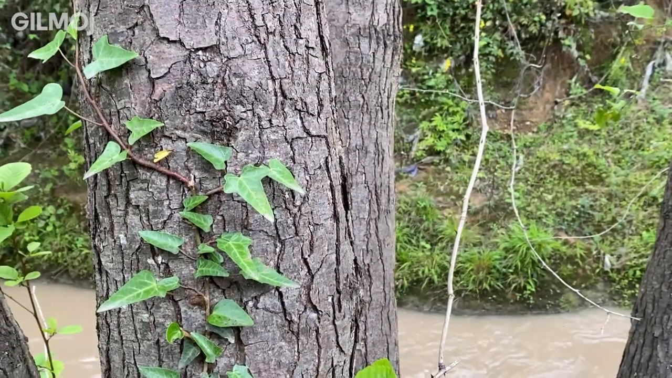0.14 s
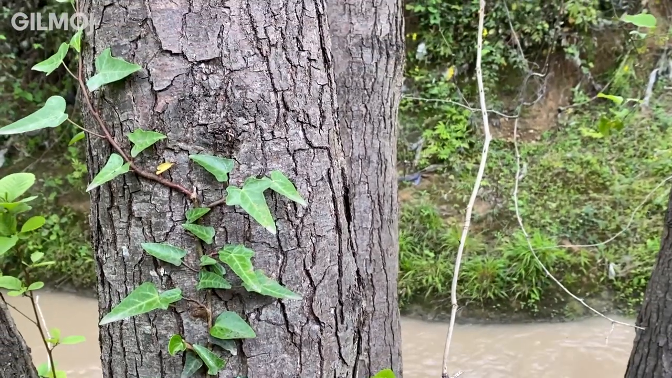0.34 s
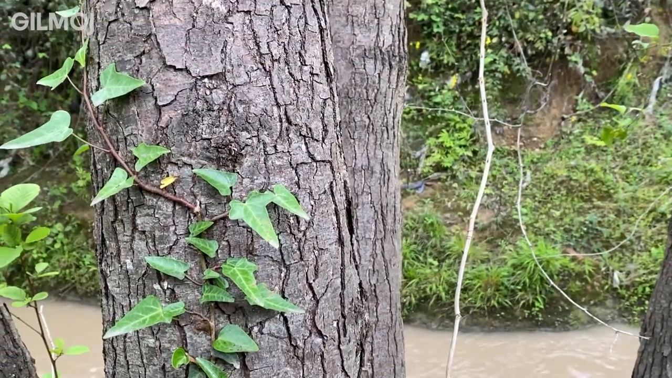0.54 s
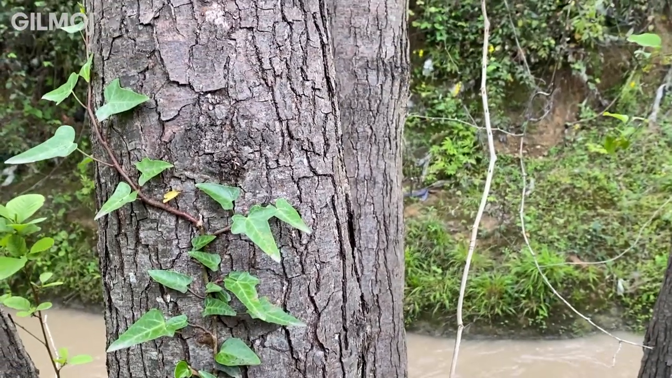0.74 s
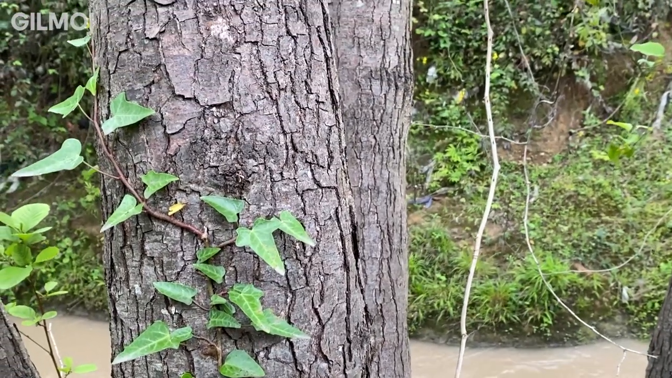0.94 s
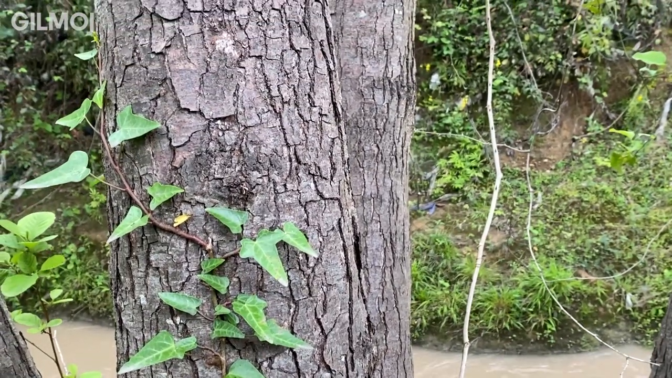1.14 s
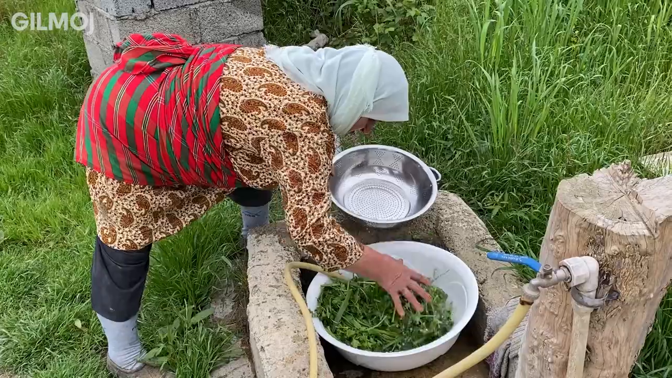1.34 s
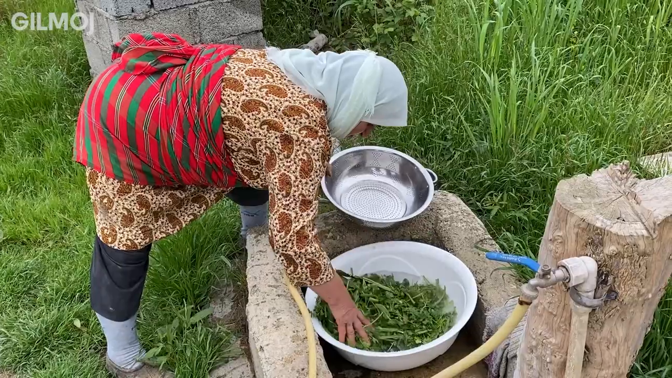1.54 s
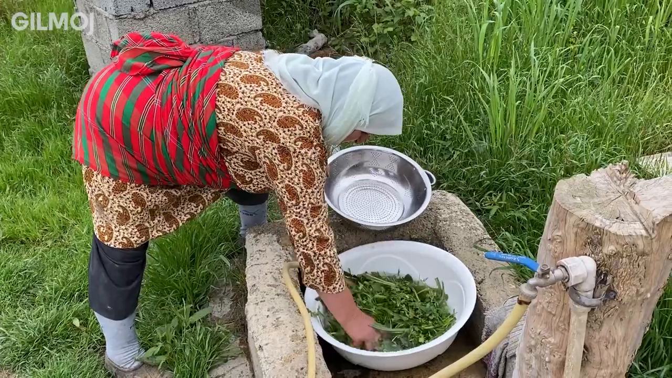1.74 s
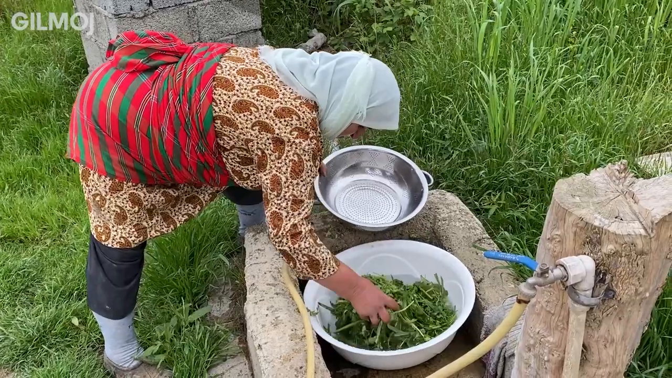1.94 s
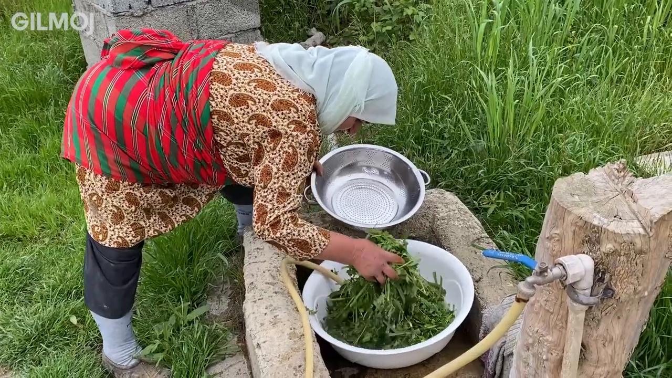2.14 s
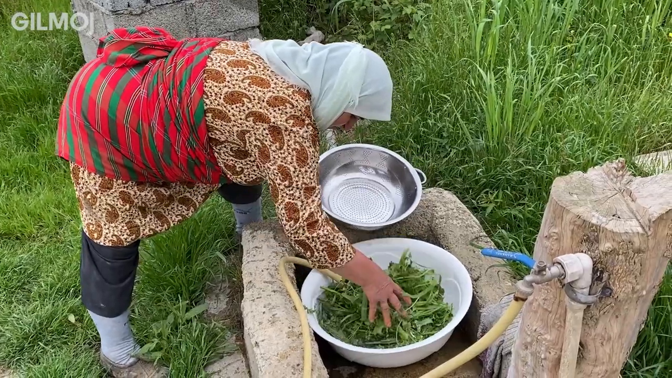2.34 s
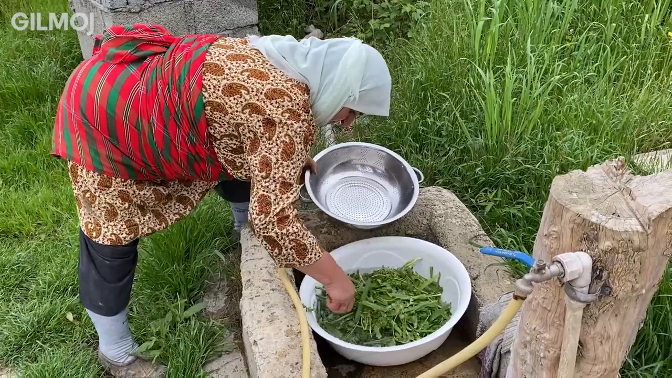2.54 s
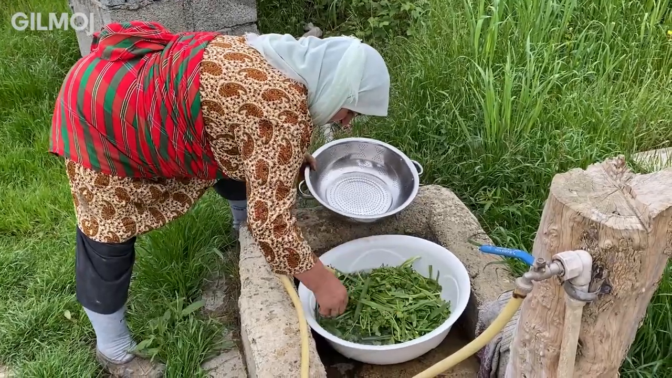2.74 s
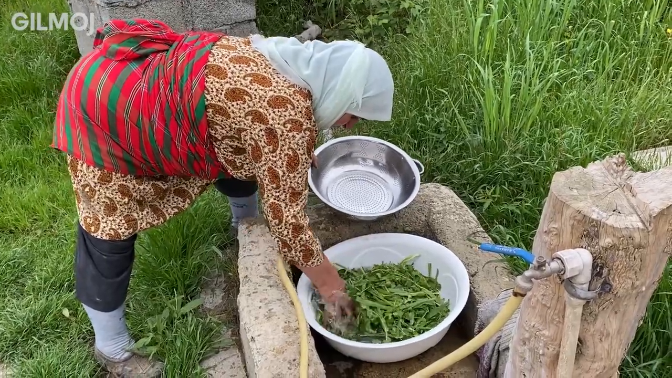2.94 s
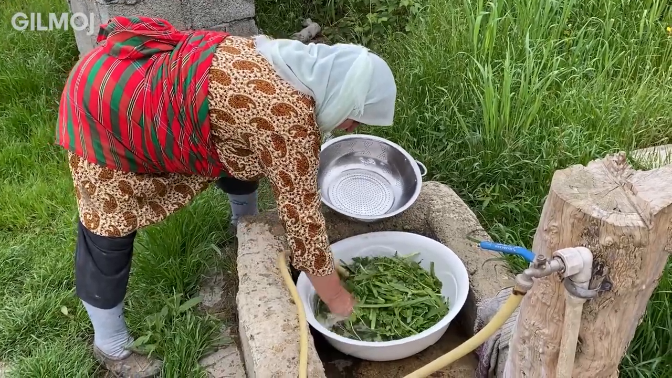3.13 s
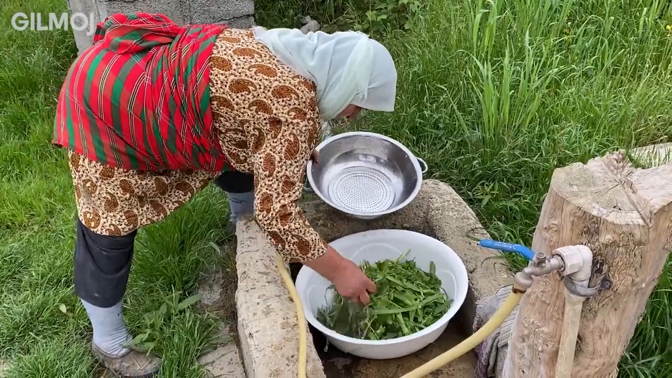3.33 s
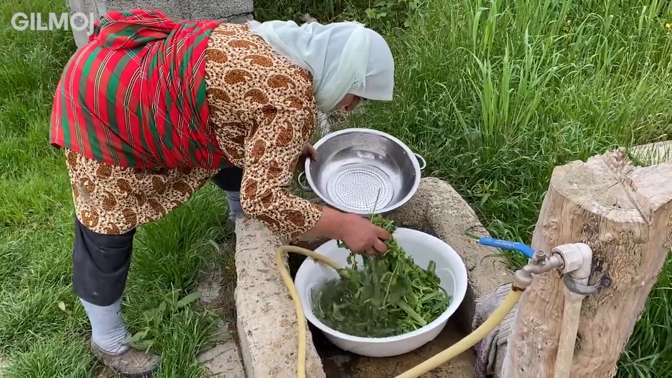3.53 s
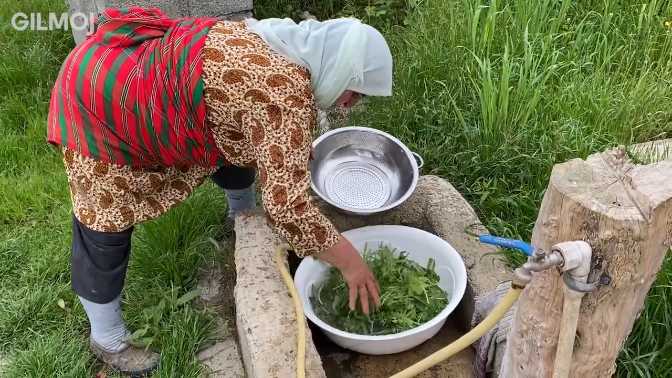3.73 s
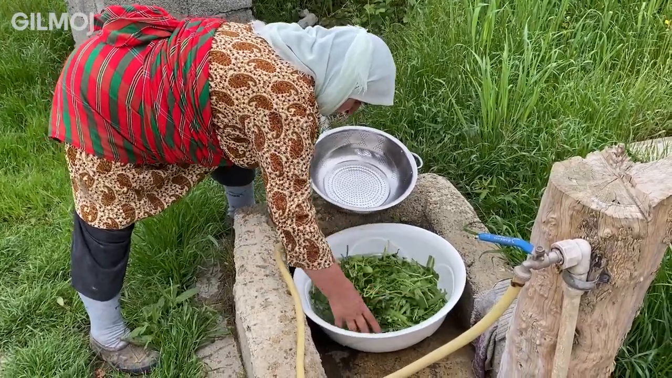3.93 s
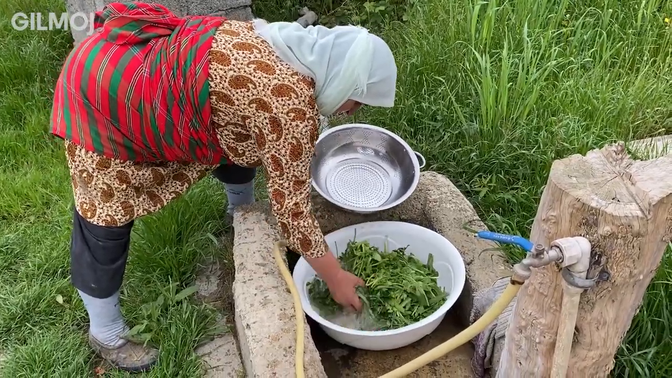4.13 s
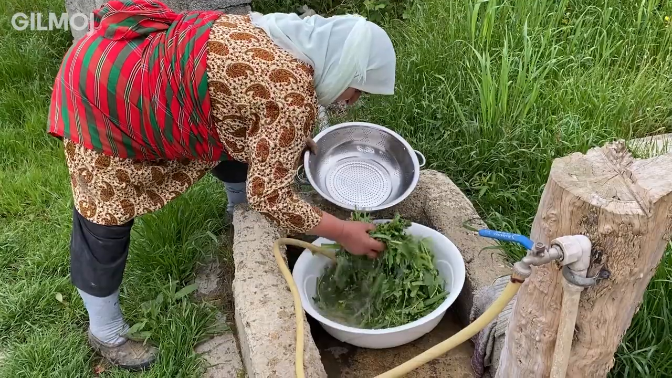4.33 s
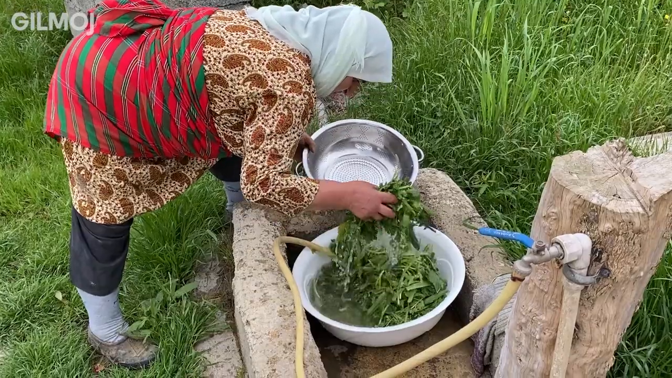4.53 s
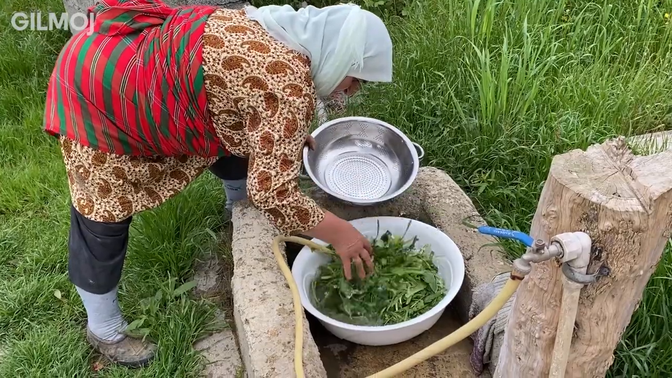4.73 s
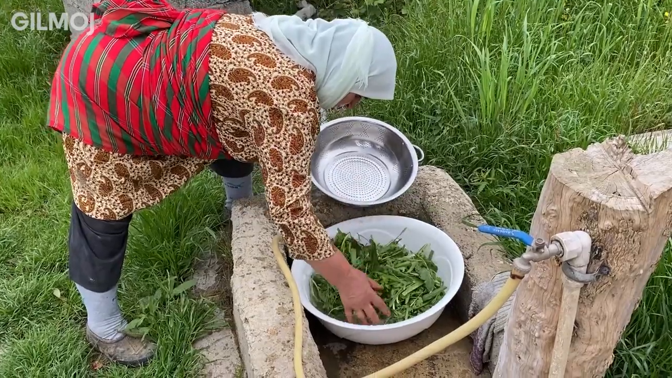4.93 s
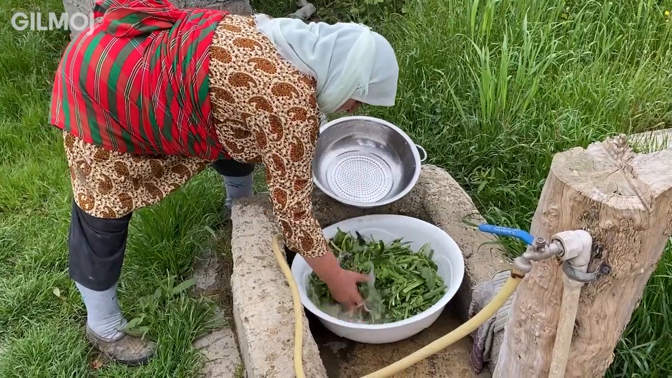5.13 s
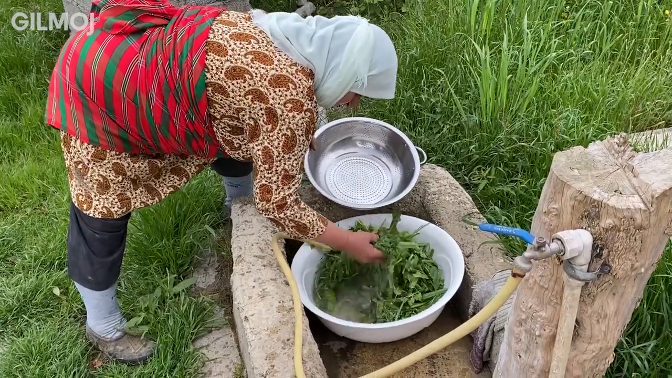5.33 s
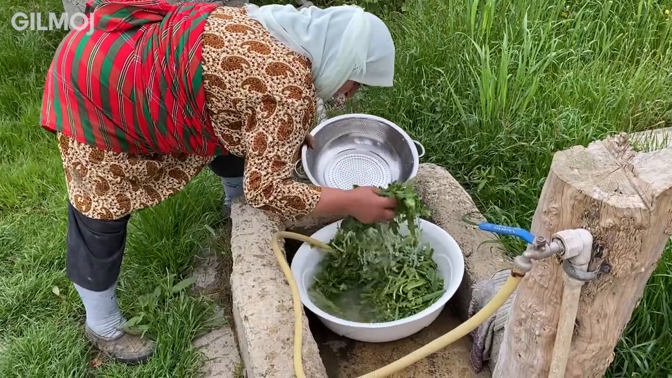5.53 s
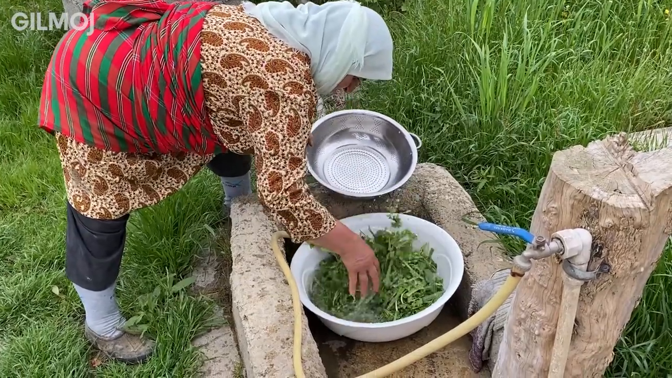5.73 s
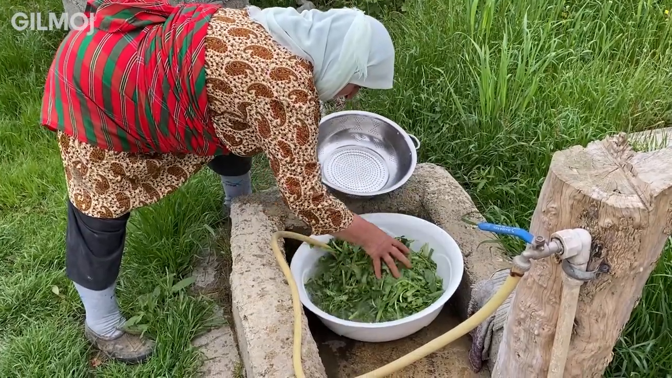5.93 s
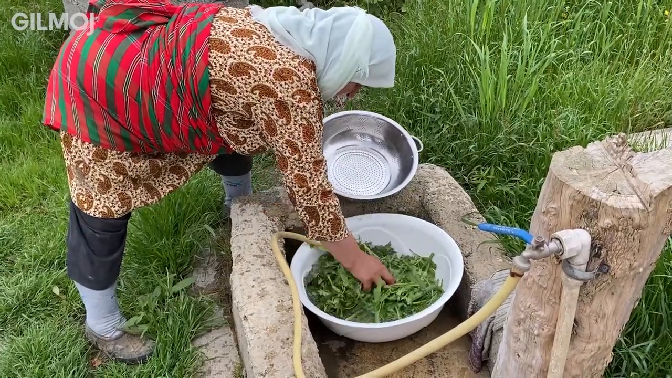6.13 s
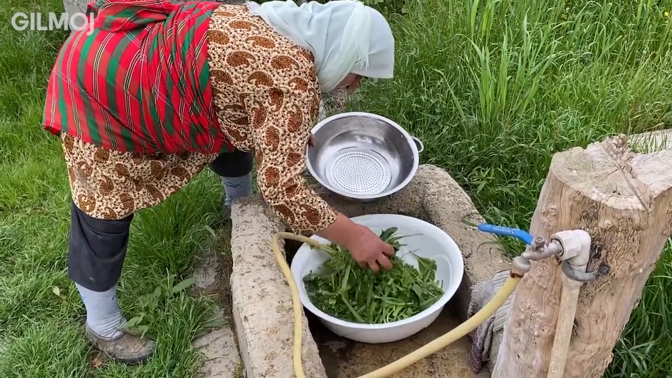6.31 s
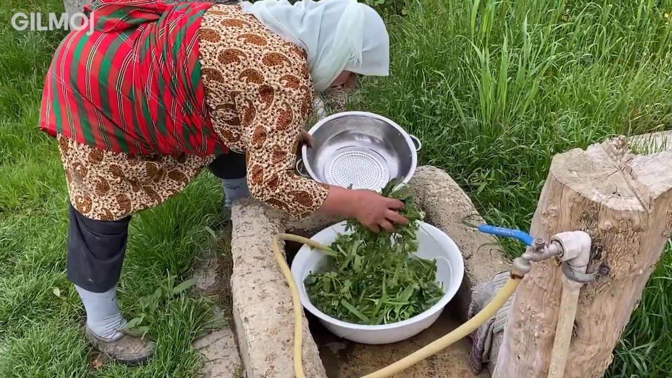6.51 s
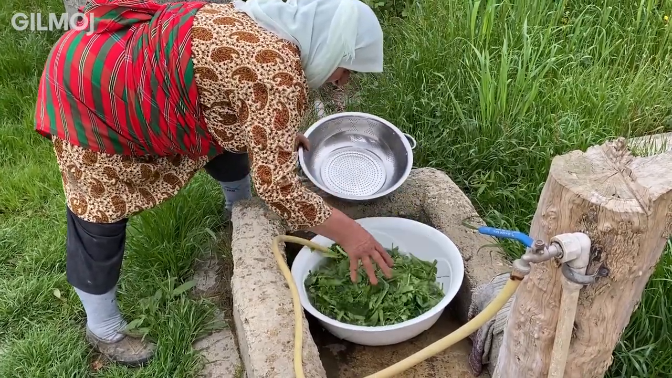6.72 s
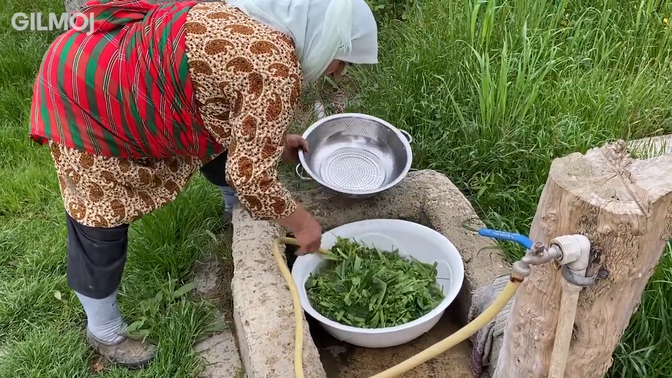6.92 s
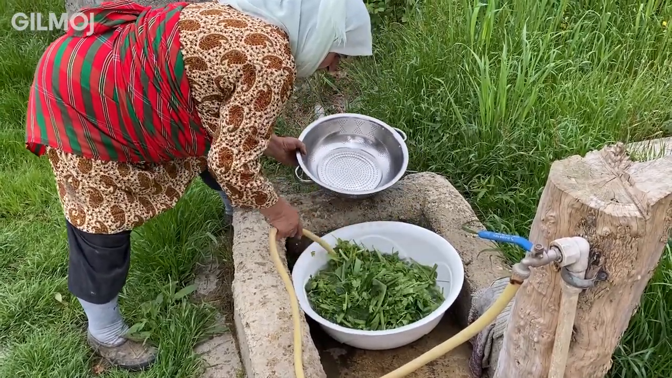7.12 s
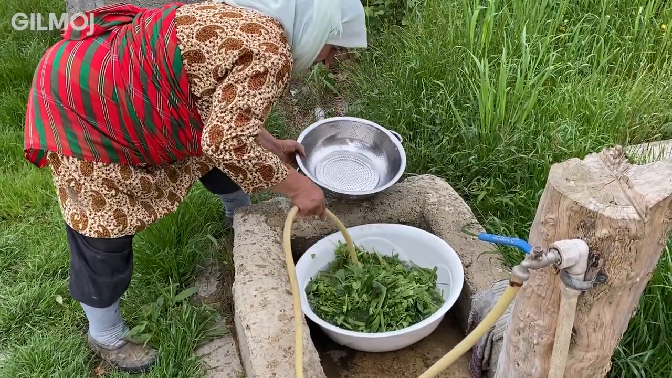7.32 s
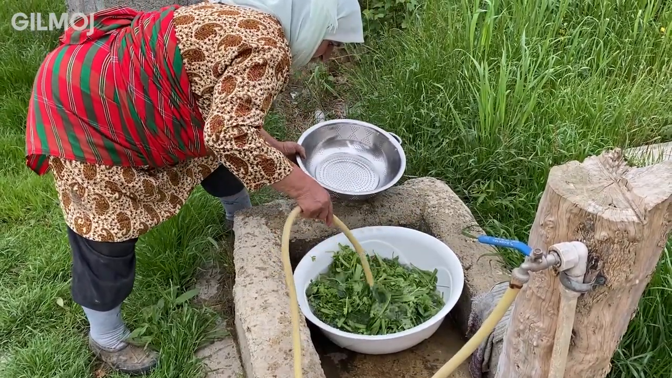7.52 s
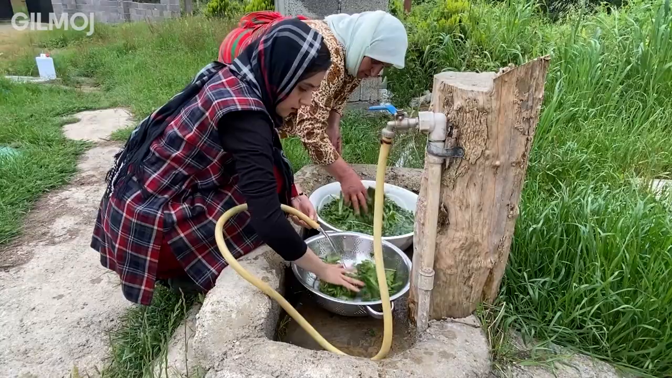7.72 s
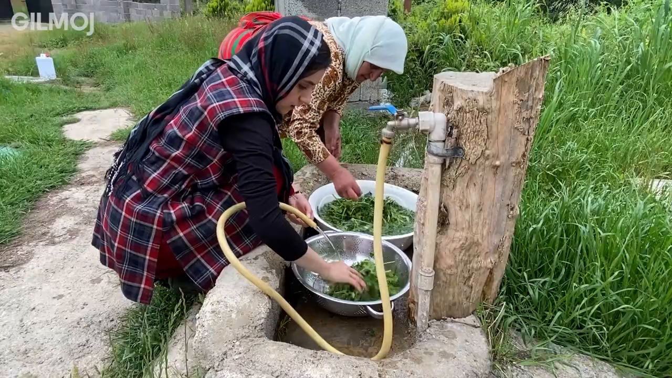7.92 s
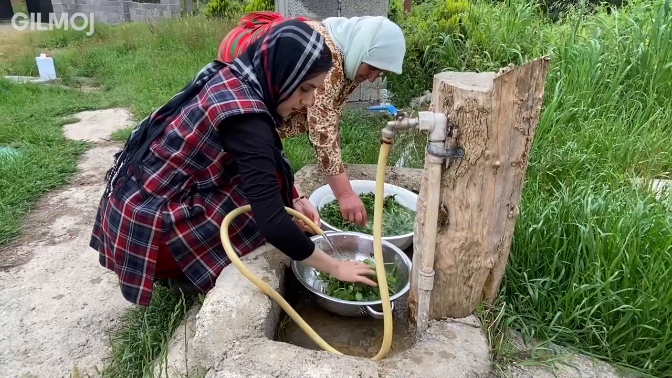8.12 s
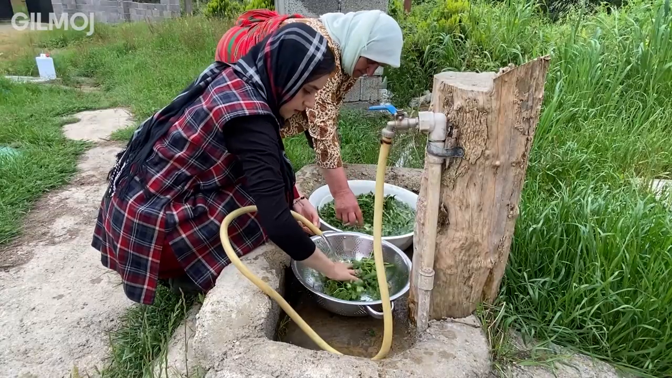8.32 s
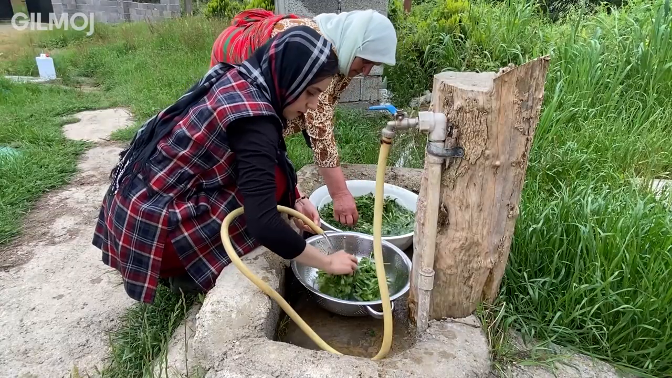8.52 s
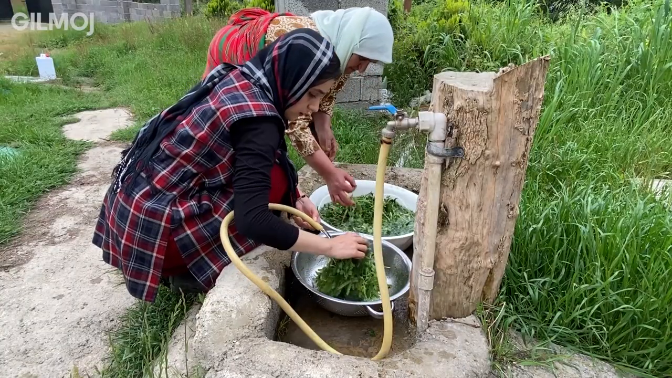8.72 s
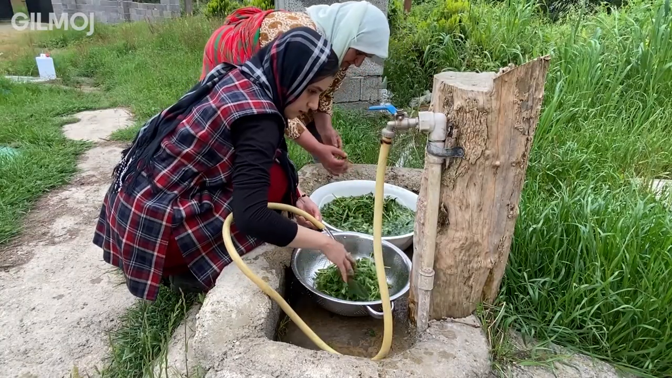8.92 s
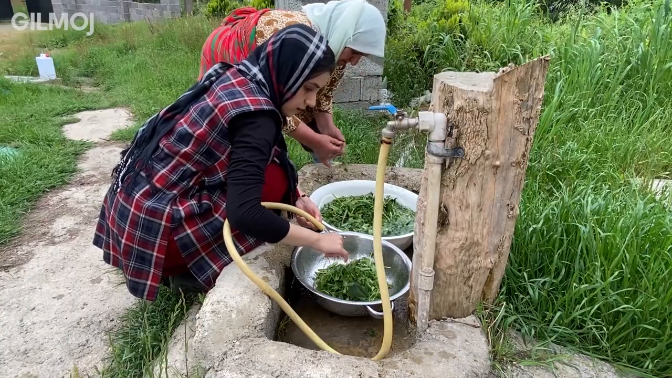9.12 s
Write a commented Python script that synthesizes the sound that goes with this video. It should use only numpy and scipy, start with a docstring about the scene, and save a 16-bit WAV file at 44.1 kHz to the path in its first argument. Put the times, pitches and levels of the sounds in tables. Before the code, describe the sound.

Close splashes, plops and drips of leaves being washed by hand outdoors, with distant birdsong, after a moment of running stream.

```python
"""Beside a murmuring stream, then at a garden tap where a hand stirs, lifts and drops wet greens in a bowl.
Close to the microphone the water sloshes and sprays, bubbles ring, leaves snap and the bowl is knocked.
Songbirds whistle, trill and buzz in trees some way off, blurred by echoes from trunks and leaves.
Under it all lies the low hum of the countryside, with one soft bump near the microphone."""
import sys
import numpy as np
from scipy import signal
from scipy.fft import rfft, irfft
from scipy.io import wavfile
from scipy.ndimage import uniform_filter1d

SR = 44100
rng = np.random.default_rng(int(sys.argv[2]) if len(sys.argv) > 2 else 0)


def put_to_file(sound):
    """Save the sound as 16-bit audio at rate SR, in the file named by the first command-line argument."""
    columns = np.atleast_2d(sound).T  # one column per channel
    safe = np.clip(columns, -1, 1)
    whole_steps = np.round(safe * 32767)
    wavfile.write(sys.argv[1], SR, whole_steps.astype(np.int16))


N = 403956


def washing():
    """Hand and greens in the water, close up: bubbly slosh, crisp slaps and crackling spray."""
    # hand sweeps: (start [s], peak [s], end [s], slosh [dB], spray [dB])
    stirs = [(1.567, 1.676, 1.925, -52.5, -59), (2.898, 3.09, 3.43, -44.5, -50),
             (3.437, 3.562, 3.87, -88, -62.5), (4.026, 4.097, 4.492, -44, -52),
             (4.415, 4.51, 4.97, -66, -56), (5.04, 5.145, 5.595, -47.5, -55.5),
             (7.302, 7.427, 7.95, -103, -58.5)]
    # greens hitting the water: (peak [s], rise [s], slap [dB], spray re slap [dB], slosh re slap [dB])
    splashes = [(1.419, 0.021, -36.5, 1.5, -1.5), (2.3, .064, -77.5, 17.5, -9),
                (2.404, 0.023, -42.5, -1.5, -5.5), (3.12, 0.018, -45.5, -1, -18),
                (3.238, 0.0021, -45, -2, -11), (3.792, 0.013, -42, 5.5, 5.5),
                (4.811, 0.039, -39, 1.5, -3.5), (5.269, 0.0073, -49, 4, -2), (5.783, .017, -35, 2.5, -5.5),
                (6.134, 0.042, -49, -10, -25), (6.722, 0.021, -47.5, 4, -7), (8.08, 0.094, -69, 10, -4),
                (8.491, 0.036, -59, -3, -20)]
    # the hand going under without spray: (time [s], level [dB])
    plunges = [(3.913, -44.5), (4.976, -44.5)]
    # spectra of churning water, slaps and spray: (frequency [Hz], relative level [dB])
    churn_spectrum = [(200, -9), (500, -3.5), (900, -5), (1700, 2), (3000, 0), (7000, -18), (10000, -70)]
    slap_spectrum = [(400, -30), (1000, -10.5), (1600, 1.5), (3000, 1.5), (5000, -8.5), (9000, -26)]
    spray_spectrum = [(2000, -8.5), (4000, 5), (10000, 3), (15500, -3.5)]
    t = np.arange(N) / SR
    slosh, spray, slap = np.zeros((3, N))
    lumps = flicker(450, 2.4)  # stirring comes in small surges
    for start, peak, end, slosh_db, spray_db in stirs:
        gate = np.clip(np.minimum((t - start) / .015, (end - t) / .09 + .5), 0, 1) * lumps
        from_peak = np.interp(t, [start, peak, end], [1, 0, 1])
        sweep_db = np.where(t < peak, -34.5, -24) * from_peak ** 1.66
        slosh += gate * amp(slosh_db + sweep_db)
        spray += gate * amp(spray_db + 0.22 * sweep_db)  # spray follows the sweep only in part
    for time, rise, db, spray_db, slosh_db in splashes:
        impact = surge(t - time, rise, t60=0.11 + 1.74 * rise)  # slower slaps die more slowly
        slap += amp(db) * impact
        slosh += amp(db + slosh_db) * impact
        spray += amp(db + spray_db) * impact
    for time, db in plunges:
        slosh += amp(db) * surge(t - time, rise=0.0029, t60=0.4)
    churn = colour(rng.standard_normal(N) * flicker(80, 0.57), churn_spectrum)
    froth = bubbles(per_s=420, low_hz=880, high_hz=3800, cycles=26, spread_db=3)
    crisp = colour(rng.standard_normal(N) * flicker(60, 2.9), slap_spectrum)
    crackle = colour(rng.standard_normal(N) * flicker(40, 4.2) * flicker(300, 2.5), spray_spectrum)
    return slosh * (.64 * churn + .75 * froth) + slap * (crisp + 0.24 * froth) + spray * crackle


def bubbles(per_s, low_hz, high_hz, cycles, spread_db):
    """Froth: many bubbles ring briefly, each at a random pitch and strength."""
    strength = amp(spread_db * np.minimum(rng.exponential(1, N), 4))
    births = strength * (rng.random(N) < per_s / SR)
    kind = rng.integers(0, 16, N)
    return evened(sum(signal.oaconvolve(births * (kind == k), ring(hz, cycles / hz, glide=0.072))[:N]
                      for k, hz in enumerate(np.geomspace(low_hz, high_hz, 16))))


def drops():
    """Single drops and bubbles plop with a rising tone, roughened by splatter."""
    # plops: (time [s], level [dB], pitch [Hz])
    plops = [(1.729, -36, 2300), (2.44, -43.5, 803), (3.057, -33, 1013), (3.25, -38.5, 1384),
             (3.313, -38, 1630), (3.969, -36, 620), (4.146, -38, 665), (4.189, -39, 678),
             (4.397, -34.5, 1027), (4.528, -40.5, 923), (4.685, -33.5, 2300), (4.732, -37.5, 777),
             (5.079, -34.5, 842), (5.127, -33.5, 1575), (5.195, -32.5, 1600), (5.226, -34, 1715),
             (5.397, -36, 3340), (6.964, -44.5, 2570), (8.678, -51.5, 1570), (8.809, -39, 2790)]
    out = np.zeros(N)
    for time, db, hz in plops:
        plop = ring(hz, t60=.045 + 20 / hz, glide=.04)
        splatter = .75 + .55 * flutter(len(plop), 40)
        swell = np.minimum(np.arange(len(plop)) / SR / .0025, 1)
        add(out, time, amp(db) * plop * swell * splatter)
    return out


def leaf_snaps():
    """Wet leaves snap: a bright crack with a short tail over a weaker midrange body."""
    # snaps: (time [s], level before filtering [dB])
    snaps = [(1.901, -35), (3.124, -27), (3.235, -22), (4.3222, -33), (4.789, -25.5), (5.3822, -37.5),
             (5.7504, -26), (5.7738, -19), (7.3104, -46), (7.3841, -49), (7.4255, -45), (7.599, -22),
             (7.6393, -40), (7.6908, -30.5), (7.7423, -36.5), (8.067, -42), (8.469, -27.5)]
    out, t = np.zeros(N), np.arange(1500) / SR
    for time, db in snaps:
        crack = rng.standard_normal(len(t)) * (amp(-60 * t / 0.0086) + 0.19 * amp(-60 * t / 0.059))
        for band_hz, band_db in ([6800, 12500], 0), ([2200, 6500], -6.5):
            band = signal.lfilter(*signal.butter(2, band_hz, "band", fs=SR), crack)
            add(out, time, amp(db + band_db) * band)
    return out


def squelches():
    """Squeezed leaves and hollow gulps of water: short, fading bands of noise."""
    # squeezes: (time [s], length [s], start [Hz], end [Hz], level [dB], stays in tune for [cycles])
    squeezes = [(1.445, 0.048, 804, 482, -30.5, 1.1), (3.019, 0.19, 747, 852, -48.5, 2),
                (3.908, 0.057, 2620, 2510, -40, 8.4), (3.91, 0.082, 190, 151, -42, 1.2),
                (4.967, 0.056, 2580, 2420, -39.5, 4.7), (5.031, 0.13, 336, 301, -44.5, 1.3),
                (5.162, 0.11, 216, 233, -47.5, 2.7), (5.266, 0.044, 3270, 3430, -37.5, 3.8),
                (5.268, 0.042, 810, 1224, -39, 4.5), (5.774, 0.031, 1290, 1170, -27, 1.7),
                (7.387, 0.088, 3300, 3810, -50.5, 1), (7.749, 0.098, 2520, 1957, -42.5, 1.27),
                (8.771, 0.034, 2330, 2160, -33, 4.3)]
    out = np.zeros(N)
    for time, length, start_hz, end_hz, db, cycles in squeezes:
        gulp = note(length, start_hz, end_hz, db, rough=0.77, hold=round(cycles * SR / start_hz))
        add(out, time, gulp * amp(np.linspace(4, -12, len(gulp))))
    return out


def bowl_knocks():
    """Each knock rings the bowl's modes, some dull and some bright."""
    # knocks: (time [s], strength [dB], tilt of the modes [dB/octave])
    knocks = [(1.451, -33.5, 3.5), (3.913, -27, -34), (3.991, -28.5, -24), (7.603, -39.5, 6),
              (7.692, -43, -1)]
    # bowl modes: (frequency [Hz], relative level [dB], t60 [s])
    modes = [(223, -23, 0.26), (320, 0, 0.2), (409, 8, 0.1), (610, -18, 0.29), (1372, -8.5, 0.06)]
    out = np.zeros(N)
    for time, db, tilt in knocks:
        for hz, mode_db, t60 in modes:
            add(out, time, amp(db - 11 + mode_db + tilt * np.log2(hz / 300)) * ring(hz, t60))
    return out


def stream(end_s=1.29):
    """On the bank: a dense fizz of running water that stops when the place changes."""
    # running water: (frequency [Hz], relative level [dB])
    spectrum = [(59, -32), (100, -32), (243, -9.5), (396, -4.5), (814, -3), (5480, -12.5), (8550, -18.5),
                (10300, -14), (15800, -29)]
    gate = np.clip((end_s - np.arange(N) / SR) / 0.0032, 0, 1)
    fizz = colour(rng.standard_normal(N) * flicker(60, 1.6), spectrum)
    return amp(-55.5) * gate * microphone(fizz, scatter=0.31, right_db=1.8)


def birds():
    """Songbirds at two distances: the deeper in the trees, the longer the blur."""
    # warbler songs: (time [s], level [dB])
    songs = [(.65, -54), (5.92, -52.5)]
    far = far_birds()
    near = near_whistles()
    song = sum(warbler(time, db) for time, db in songs)
    rattle = rattling_bird()
    near += amp(-5) * song + amp(-2) * rattle
    far += song + amp(1.5) * rattle
    return trees(near, t60=.35, blur_db=-1) + trees(far, t60=1.25, blur_db=4)


def warbler(start, db):
    """One song: three trills around a verse sung twice, then two buzzes, each closed by a downstroke."""
    # verse notes: (offset [s], length [s], start [Hz], end [Hz], relative level [dB])
    verse = [(-.09, 0.04, 4800, 3504, -3.5), (-.004, 0.0333, 5674, 4950, 4)]
    # trills: (offset [s], relative level [dB])
    trills = [(-.4, -3), (.112, 4), (.46, 5.5)]
    # notes in each trill: (count)
    trill_counts = [7, 5, 5]
    # song ending: (buzz offset [s], buzz length [s], downstroke offset [s])
    ending = [(0.626, 0.143, .79), (0.849, 0.1, 0.952)]
    song = np.zeros(N)
    for k in range(2):
        for offset, *shape in verse:
            add(song, start + offset + k * .372, note(*shape, rough=.4, hold=60))
    for (offset, trill_db), count in zip(trills, trill_counts):
        for k in range(count):
            length, end_hz, top_hz = rng.normal(1, .015, 3) * (.018, 4250, 5450)  # no two alike
            flick = arched_note(length, end_hz, top_hz, db=rng.normal(trill_db - 3, 1.5))
            add(song, start + offset + k * .0325, flick)
    for buzz_s, length, stroke_s in ending:
        add(song, start + buzz_s, note(length, 5760, 5720, db=0.79, rough=0.59, hold=55))
        add(song, start + stroke_s, note(0.0247, 5500, 4340, db=5.3, rough=0.22, hold=40))
    return amp(db) * song


def near_whistles(echo_s=.068, echo_db=-9):
    """Birds close by: three falling whistles and some thin high ones, with a single echo."""
    # thin whistles: (time [s], length [s], start [Hz], end [Hz], level [dB])
    whistles = [(3.519, 0.032, 6840, 6900, -48.5), (3.637, .022, 7200, 6900, -49),
                (3.906, .028, 7560, 7360, -49), (3.926, 0.029, 6750, 6920, -36),
                (4.04, 0.028, 7150, 7130, -44), (4.319, 0.036, 6860, 7220, -40)]
    out = np.zeros(N)
    for k, db in enumerate([-42, -36.5, -44.5]):
        add(out, 3.705 + k * .404, note(0.0618, 6320, 5880, db, rough=0.18, hold=60))
    for time, *shape in whistles:
        add(out, time, note(*shape, rough=0.22, hold=60))
    return out + amp(echo_db) * np.roll(out, round(echo_s * SR))


def rattling_bird(start_s=3.69, every_s=.0457, peak_s=4.21):
    """A run of fast downstrokes that swells and fades."""
    out = np.zeros(N)
    for time in start_s + every_s * np.arange(22):
        db = rng.normal(-40 - 10 * ((time - peak_s) / 0.48) ** 2, 1.3)
        add(out, time, note(.014, 6700, 4760, db, rough=0.55, hold=40))
    return out


def far_birds():
    """Deep in the trees: a repeated phrase, three climbing buzzes and stray calls."""
    # phrase notes: (offset [s], length [s], start [Hz], end [Hz], relative level [dB])
    phrase = [(0, 0.03, 3997, 4780, 4), (.075, .032, 6400, 3990, 3.5), (.122, .045, 5640, 3130, 1),
              (.165, 0.0298, 3250, 2895, -0.5)]
    # stray calls: (time [s], length [s], start [Hz], end [Hz], level [dB])
    calls = [(4.93, 0.043, 4590, 4580, -52), (4.996, 0.091, 5136, 5560, -49.5),
             (6.932, 0.032, 4400, 3070, -56), (6.983, 0.039, 3400, 4400, -56.5),
             (8.921, 0.035, 5200, 4630, -58.5)]
    out = np.zeros(N)
    for k in range(8):
        gain = amp(-52 - 2.5 * max(3 - k, 0))  # full voice from the fourth phrase on
        for offset, *shape in phrase:
            add(out, .47 + k * .297 + offset, gain * note(*shape, rough=0.55, hold=40))
    for k in range(3):  # each buzz trails into a faint, long falling whistle
        time, climb_hz = 2.95 + k * .232, k * 139
        add(out, time, note(0.16, 5299.5 + climb_hz, 5502 + climb_hz, db=-49, rough=0.73, hold=40))
        add(out, time + .155, note(0.43, 5096.5, 4418.5, db=-58, rough=0.45, hold=55))
    for time, *shape in calls:
        add(out, time, note(*shape, rough=.65, hold=60))
    return out


def bump(time=2.52, db=-38, hz=48, length=.05):
    """A short low push near the microphone, not quite in step on the two sides."""
    t = np.arange(N) / SR - time
    phase = np.array([[.4], [-.4]])
    return amp(db) * np.exp(-(2 * t / length) ** 2) * np.cos(2 * np.pi * hz * t + phase)


def country_air():
    """Distant hum and hiss of the countryside, with drifting louder and softer patches."""
    # open air: (frequency [Hz], relative level [dB])
    spectrum = [(25, -51), (59, 10), (91, 1), (235, -9), (461, -18), (710, -16.5), (1510, -25),
                (2970, -21.5), (3680, -27), (5520, -19), (7630, -30.5), (14600, -36), (15800, -37)]
    # bass of the hum: (time [s], gain [dB])
    bass = [(1.2, -15.5), (1.35, -2.5), (9.2, 0)]
    # likeness of left and right: (frequency [Hz], correlation [0-1])
    likeness = [(60, 0.92), (150, 0.71), (380, 0.24), (950, 0.011), (2380, 0.91), (5980, 1), (15000, 0.48)]
    frames, hz = N // 256 + 5, np.fft.rfftfreq(1024, 1 / SR)
    left_re, left_im, apart_re, apart_im, patches = rng.standard_normal((frames, 513, 5)).T
    patches = evened(uniform_filter1d(uniform_filter1d(patches, 10, 0), 20, 1))
    bass_db = np.interp(np.arange(frames) * 256 / SR, *np.transpose(bass))
    hum_db = bass_db / (1 + (hz[:, None] / 180) ** 2)
    shared = curve_at(likeness, hz)[:, None]
    left = left_re + 1j * left_im
    right = shared * left + np.sqrt(1 - shared ** 2) * (apart_re + 1j * apart_im)
    right *= amp(0.93 / (1 + (hz[:, None] / 1500) ** 2))  # the hum sits a little to the right
    gain = amp(curve_at(spectrum, hz)[:, None] + 2.57 * patches + hum_db)
    _, air = signal.istft(np.array([left, right]) * gain, nperseg=1024, noverlap=768)
    return amp(-56.5) * evened(air[:, :N])


def trees(sound, t60, blur_db):
    """Direct sound plus the diffuse blur of trunks and leaves."""
    t = np.arange(SR) / SR
    mid, side = rng.standard_normal((2, SR)) * amp(-60 * t / t60)
    tail = mid + 0.0073 * side * np.array([[1], [-1]])
    blur = signal.fftconvolve(sound[None], tail / np.linalg.norm(tail[0]), axes=1)[:, :N]
    return sound + amp(blur_db) * blur


def microphone(sound, scatter, right_db):
    """Two ports: scattered sound adds on one side and cancels on the other; treble reaches the left late."""
    hz = np.fft.rfftfreq(N, 1 / SR)
    late = np.exp(-2j * np.pi * np.maximum(hz - 6850, 0) * 13 / SR)  # 13 samples, above 6850 Hz
    tail = rng.standard_normal(3000) * amp(-60 * np.arange(3000) / SR / 0.072)
    side = scatter * signal.oaconvolve(sound, tail / np.linalg.norm(tail))[:N]
    lean = amp(right_db / (1 + (hz / 4000) ** 2))  # lows and mids lean to the right
    return np.array([irfft(rfft(sound + side) * late / lean, N), irfft(rfft(sound - side) * lean, N)])


def note(length, start_hz, end_hz, db, rough, hold):
    """A gliding sine that levels off; rough is the share of its amplitude that flutters."""
    progress = np.linspace(0, 1, round(length * SR))
    hz = end_hz + (start_hz - end_hz) * (1 - progress) ** (1 + 12.13 * min(length, .06))
    envelope = signal.windows.tukey(len(hz), .5) * (1 - rough + rough * flutter(len(hz), hold))
    return amp(db) * envelope * np.sin(2 * np.pi * np.cumsum(hz) / SR)


def arched_note(length, end_hz, top_hz, db):
    """A clean note that flicks up and down again."""
    hz = top_hz + (end_hz - top_hz) * abs(np.linspace(-1, 1, round(length * SR)))
    return amp(db) * signal.windows.tukey(len(hz), .3) * np.sin(2 * np.pi * np.cumsum(hz) / SR)


def ring(hz, t60, glide=0.):
    """A dying tone with a soft start; glide raises its pitch, as in a bubble."""
    t = np.arange(round(t60 * SR)) / SR
    envelope = np.minimum(t / 0.0014, 1) * amp(-60 * t / t60)
    return envelope * np.sin(2 * np.pi * hz * t * (1 + glide * t / t60))


def surge(t, rise, t60):
    """Bell-shaped rise to time zero, then a steady decay."""
    return np.where(t < 0, np.exp(-(t / rise) ** 2), amp(-60 * np.maximum(t, 0) / t60))


def flutter(count, hold):
    """Smooth noise that holds its value for about hold samples."""
    return evened(uniform_filter1d(uniform_filter1d(rng.standard_normal(count), hold), hold))


def flicker(hold, depth_db):
    """Random gain that holds for about hold samples."""
    return evened(amp(depth_db * flutter(N, hold)))


def colour(sound, spectrum):
    """Filter by a spectrum, to unit RMS."""
    return evened(irfft(rfft(sound) * amp(curve_at(spectrum, np.fft.rfftfreq(N, 1 / SR))), N))


def curve_at(points, hz):
    """Interpolate along log frequency."""
    point_hz, value = np.transpose(points)
    return np.interp(np.log(hz + 1), np.log(point_hz + 1), value)


def amp(db):
    return 10 ** (np.asarray(db) / 20)


def evened(x):
    return x / np.sqrt(np.mean(x ** 2) + 1e-20)


def add(mix, time, sound):
    part = mix[round(time * SR):][:len(sound)]
    part += sound[:len(part)]


def scene():
    """The stream, then the bowl close to the microphone, with birds and open air behind."""
    surroundings = country_air() + stream() + birds() + bump()
    bowl = washing() + drops() + leaf_snaps() + squelches() + bowl_knocks()
    return surroundings + microphone(bowl, scatter=0.34, right_db=0.3)


def record(dry):
    """The recorder's band limit, at 15.8 kHz."""
    lowpass = signal.firwin(511, 15800, window=("kaiser", 9), fs=SR)
    return signal.oaconvolve(dry, lowpass[None], "same")


dry = scene()
out = record(dry)
put_to_file(out)
```